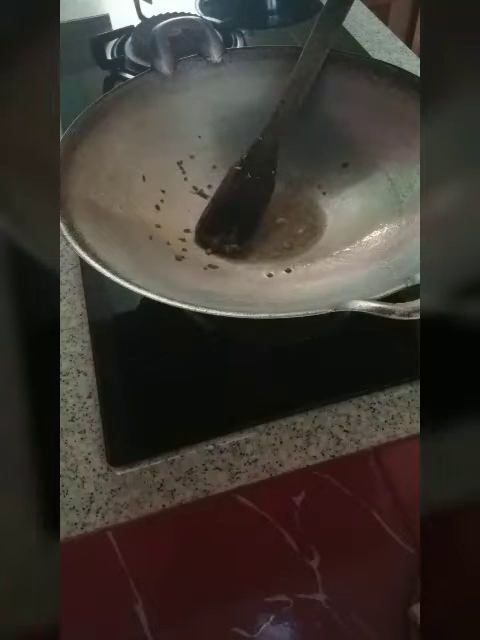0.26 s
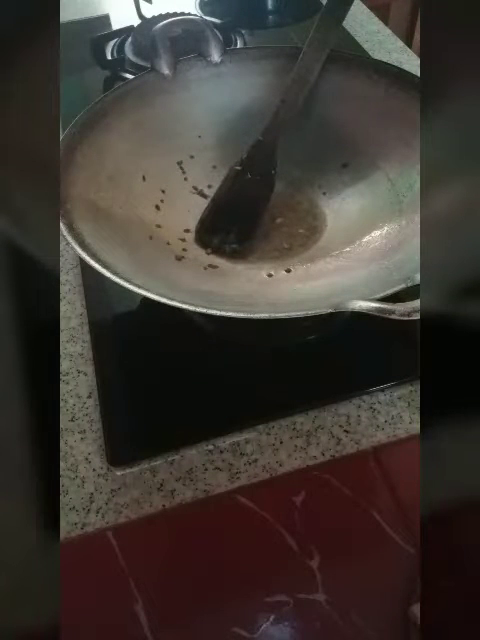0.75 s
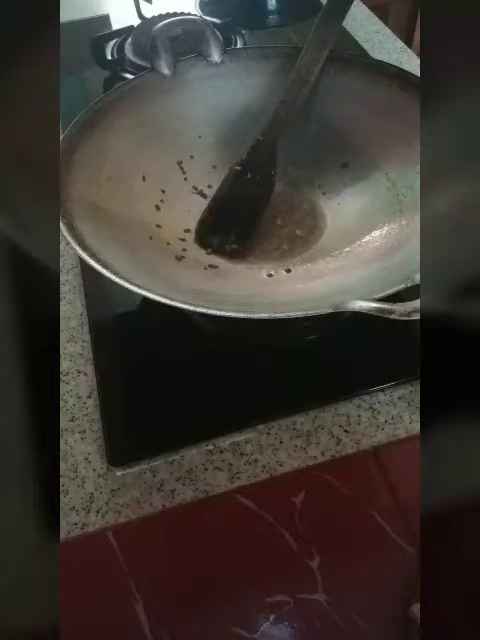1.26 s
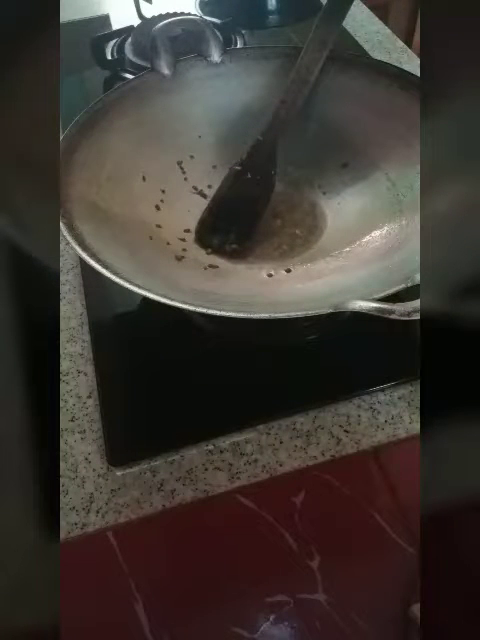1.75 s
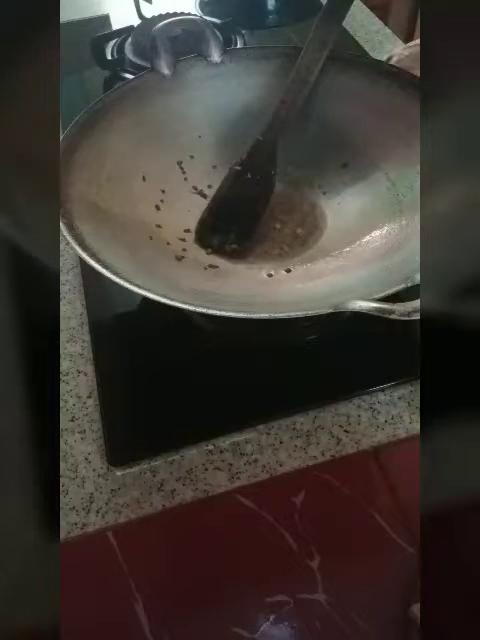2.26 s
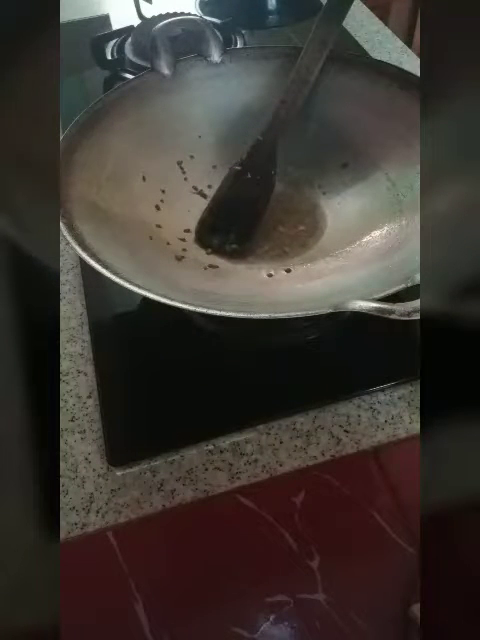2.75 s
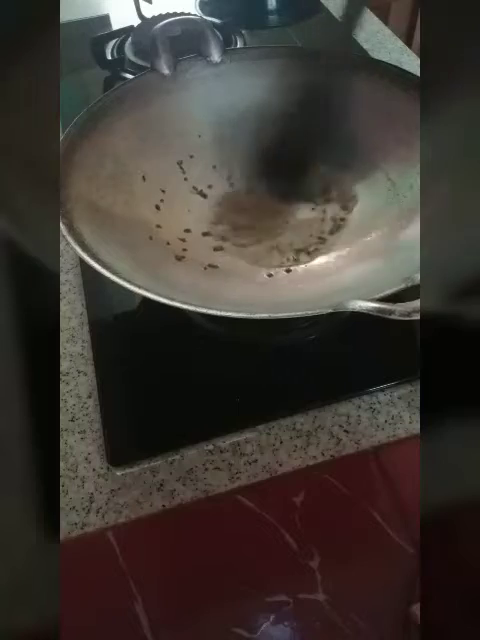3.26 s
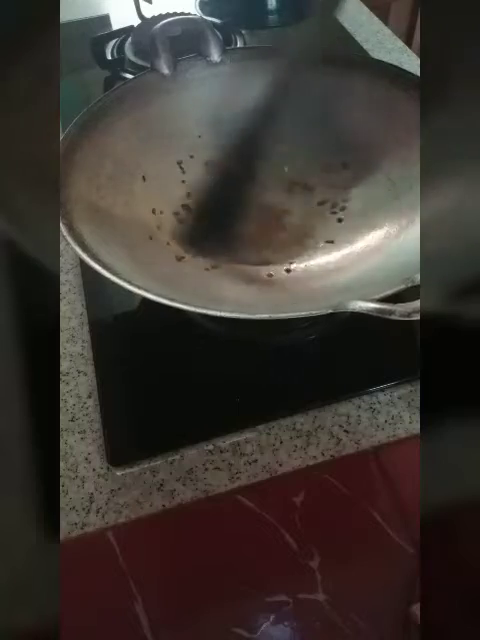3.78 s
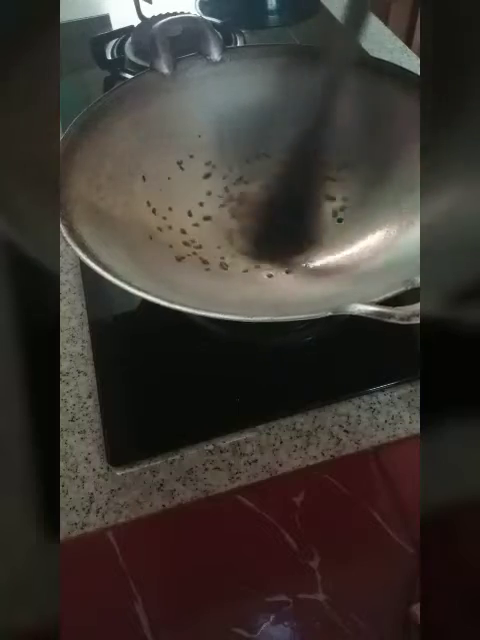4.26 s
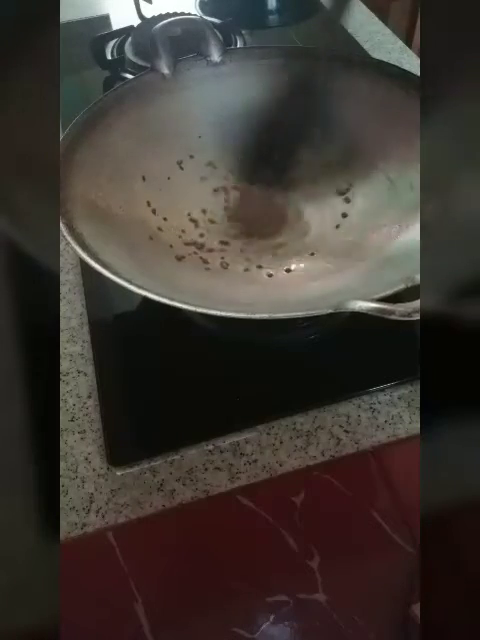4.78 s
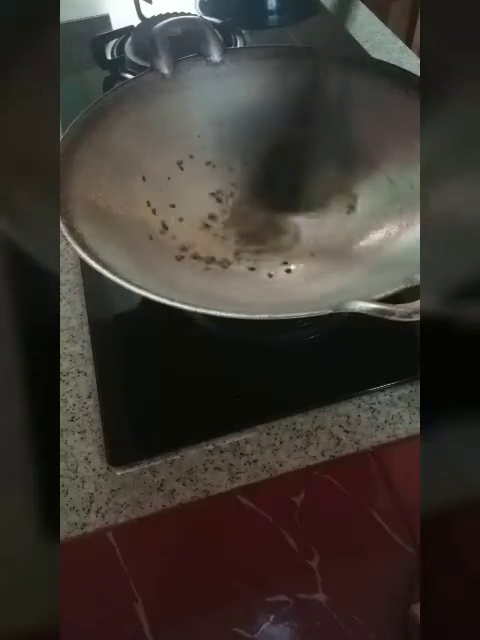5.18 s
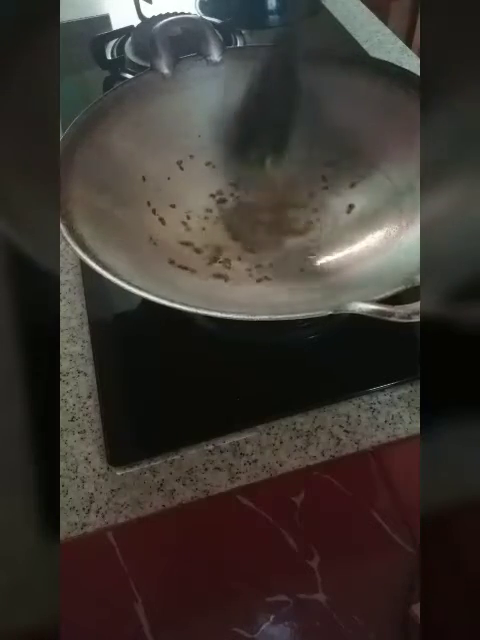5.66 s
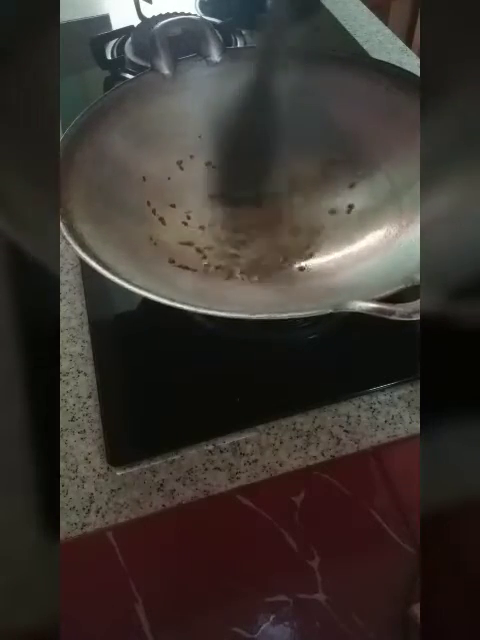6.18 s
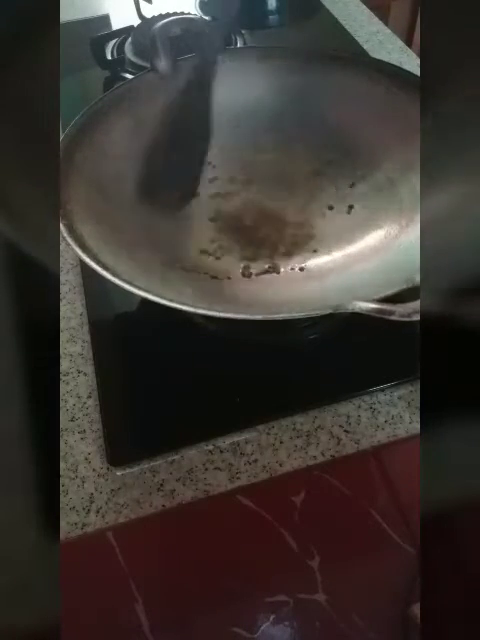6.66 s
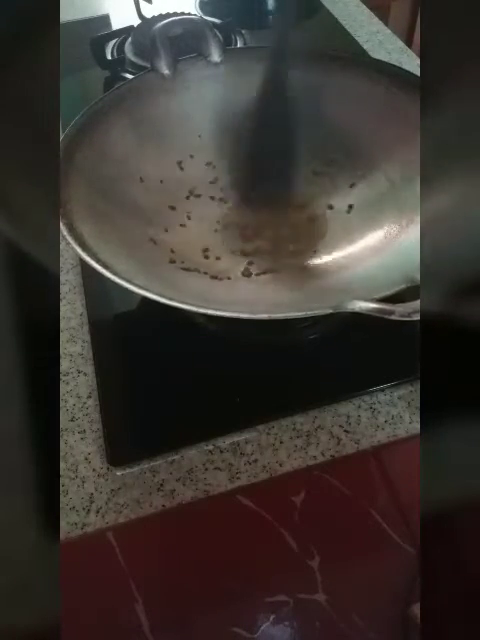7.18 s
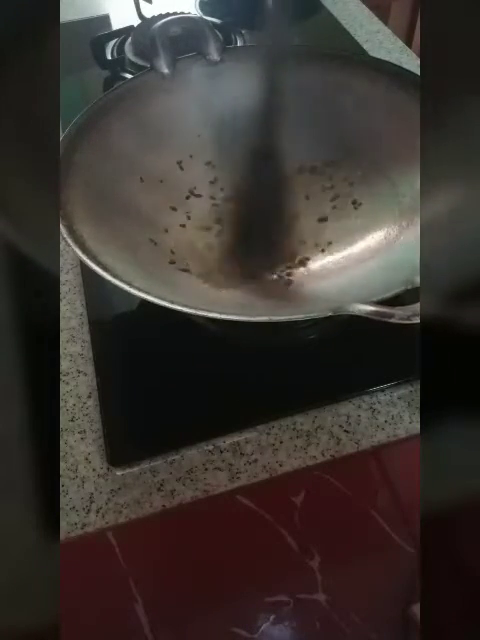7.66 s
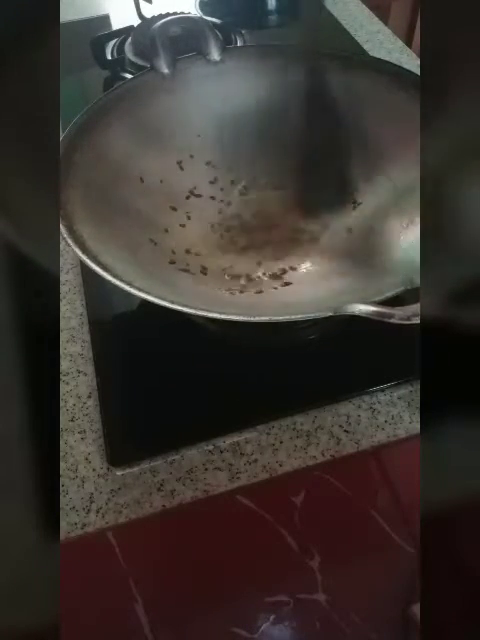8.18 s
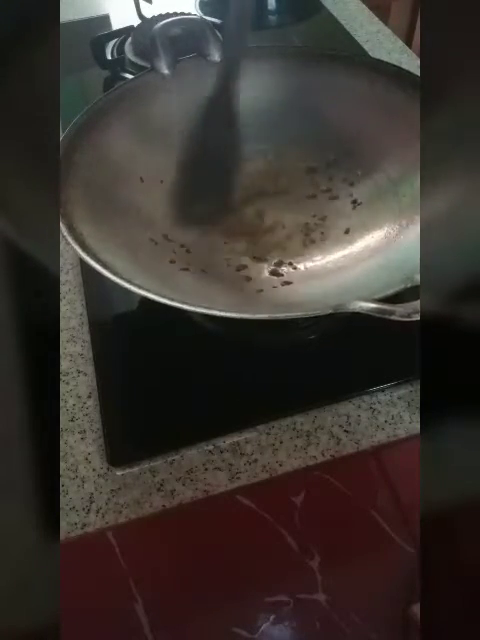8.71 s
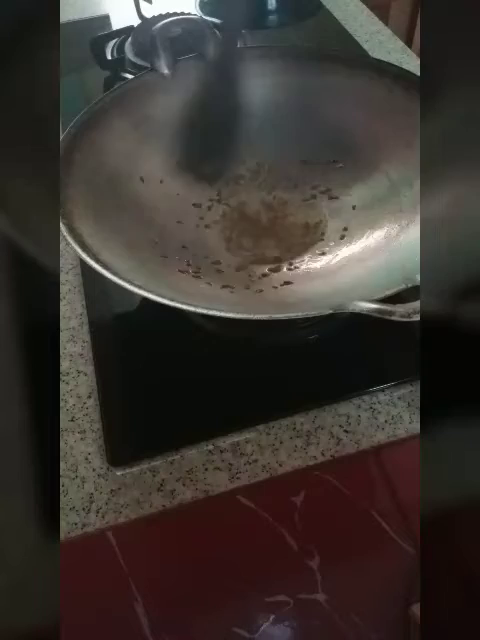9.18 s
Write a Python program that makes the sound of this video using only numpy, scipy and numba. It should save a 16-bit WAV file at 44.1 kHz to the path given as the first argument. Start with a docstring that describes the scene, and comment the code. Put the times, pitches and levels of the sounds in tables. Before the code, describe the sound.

Spices sizzle and pop sharply in hot oil in a steel wok, then a wooden spatula knocks and scrapes through the crackle.

```python
"""Whole spices fry in oil in a steel wok: steam bubbles burst as short damped tones that rise in pitch,
seeds pop and tap the steel, and oil spits in sprays of tiny cracks. A wooden spatula knocks, scrapes and rocks
the wok, which answers on its modes. Dull thuds from elsewhere in the kitchen and a soft tone come early on,
over a low murmur of fans and burner. Tiled walls add a short bright tail, heard by a phone with two unlike
microphone ports."""
import sys
import numpy as np
from scipy import signal
from scipy.fft import rfft, irfft
from scipy.io import wavfile
from numba import njit

SR = 44100
rng = np.random.default_rng(int(sys.argv[2]) if len(sys.argv) > 2 else 0)


def dump_mix(stems):
    """Bounce the given channels to the path in sys.argv[1] as a 16-bit WAV at rate SR."""
    frames = np.atleast_2d(stems).T  # one column per channel
    limited = np.clip(frames, -1, 1)  # hard clip at full scale
    pcm = np.round(limited * 32767).astype(np.int16)
    wavfile.write(sys.argv[1], SR, pcm)


N = 416302

# Seeds bursting. Each row: start in seconds, relative level in dB, pitch in Hz, ring (60 dB decay) in cycles.
SEED_POPS = [(0.030, -8.5, 3770, 7.8), (0.197, -14.5, 4000, 7.2), (0.242, -11, 4540, 1.1),
             (0.26, -15, 3530, 8.8), (0.277, -17, 3460, 14), (0.311, -15.5, 3600, 4.6),
             (0.481, -11, 4930, 4.5), (0.52, -31, 3840, 8), (0.604, -27, 3850, 10), (0.639, -22, 4300, 8.3),
             (0.691, -12.5, 3960, 4.6), (0.875, -14, 4250, 6.6), (0.94, -10, 4430, 3.3),
             (0.977, -17.5, 2420, 7.4), (1.001, -12, 3630, 13), (1.039, -15, 2890, 13),
             (1.096, -10, 3640, 4.3), (1.213, -14, 4650, 10), (1.261, -8.5, 3600, 6),
             (1.313, -21.5, 2420, 9.9), (1.393, -19, 5260, 4.7), (1.409, -13.5, 4140, 4.7),
             (1.47, -21, 4100, 11), (1.497, -17, 4440, 19), (1.524, -7.5, 2920, 11),
             (1.683, -9.5, 2600, 2.7), (1.727, -16, 5870, 6.7), (1.779, -21.5, 4700, 16),
             (1.987, -20, 3050, 14), (1.996, -21, 3250, 10), (2.043, -9, 4300, 3.8),
             (2.066, -15, 2150, 6.9), (2.07, -15, 3360, 8.2), (2.11, -20, 3930, 5.5), (2.184, -25, 3900, 8),
             (2.229, -6, 2950, 2.3), (2.301, -18, 4540, 13), (2.384, -14.5, 2300, 6.8),
             (2.439, -13, 4010, 7.3), (2.587, -18, 4800, 5), (2.64, -12.5, 5200, 4.8),
             (2.674, -17.5, 5130, 6.9), (2.734, -15.5, 5300, 6.2), (2.819, -30, 3800, 4.6),
             (2.856, -21, 3280, 4.1), (2.89, -22, 3870, 6.5), (2.904, -20, 5840, 6.9),
             (2.953, -13, 3430, 3.8), (3.02, -32, 3670, 5.7), (3.088, -38, 4000, 6.2),
             (3.105, -14, 4760, 5.9), (3.127, -19.5, 3560, 19), (3.173, -17, 3770, 4.7),
             (3.276, -9, 2860, 2.5), (3.304, -20, 3760, 19), (3.337, -18, 3200, 2.8),
             (3.387, -17, 3500, 5.4), (3.494, -19.5, 3670, 4.4), (3.528, -11.5, 3720, 3.7),
             (3.556, -16, 2500, 8), (3.625, -8.5, 2250, 3.4), (3.677, -14, 3330, 33),
             (3.742, -17, 2180, 6.4), (3.818, -15.5, 5330, 14), (3.882, -17.5, 4970, 23),
             (3.966, -24, 5360, 19), (4.021, -18, 3250, 4.3), (4.081, -22, 6900, 32),
             (4.13, -19, 3420, 3.8), (4.142, -13.5, 3200, 2.5), (4.213, -16, 4340, 4.9),
             (4.242, -17.5, 3300, 4.6), (4.293, -12.5, 4660, 11), (4.325, -17, 4100, 4.6),
             (4.415, -11, 4240, 6.2), (4.481, -18, 2720, 2.7), (4.53, -13, 5200, 5),
             (4.63, -12.5, 3140, 2.7), (4.701, -22, 2580, 3), (4.728, -31, 3700, 6),
             (4.759, -15, 3950, 5.5), (4.842, -5.5, 2230, 1.5), (4.917, -23, 2670, 40),
             (4.921, -10, 4200, 16), (4.978, -11, 4630, 8.9), (5.025, -9, 3970, 3.1),
             (5.027, -25, 2670, 53), (5.097, -23, 5550, 6.8), (5.18, -19, 2070, 4.9),
             (5.233, -3.5, 2180, 3.4), (5.262, -19, 1930, 1.7), (5.407, -19.5, 4600, 7.9),
             (5.541, -29, 3440, 4.1), (5.585, -27, 2560, 9.4), (5.642, -12.5, 3280, 33),
             (5.788, -19, 4750, 12), (5.905, -18, 2750, 3.5), (5.966, -15.5, 6040, 3.2),
             (6.07, -29, 3700, 4.4), (6.11, -22, 3800, 5.4), (6.16, -13, 3540, 2.4),
             (6.385, -31, 4300, 2.1), (6.434, -14.5, 3970, 2), (6.537, -13, 4880, 9.2),
             (6.629, -22, 2000, 3), (6.681, -27, 3480, 5.2), (6.7, -28, 3700, 2.9),
             (6.847, -17.5, 4500, 3.7), (6.897, -9.5, 4150, 1.8), (7.133, -25, 3070, 4.2),
             (7.194, -19.5, 3980, 13), (7.269, -20, 3120, 4.6), (7.496, -12, 4180, 3.3),
             (7.632, -8, 3660, 0.93), (7.941, -18.5, 2450, 5.4), (7.977, -11, 4440, 5.2),
             (8.146, -22.5, 3530, 2.7), (8.219, -14, 4500, 5.1), (8.436, -9.5, 3380, 5.1),
             (8.511, -20, 3740, 13), (8.571, -17, 2300, 2.4), (8.615, -25, 4770, 15),
             (8.687, -17.5, 3400, 3.9), (8.73, -9, 3300, 1.2), (8.764, -20, 3520, 9),
             (8.971, -19.5, 4500, 7), (9.139, -20, 3400, 3.7), (9.203, -11.5, 4800, 2.7)]
# Spatula strokes, a knock that starts a scrape and rocks the wok. Each row: start in seconds, then relative
# levels in dB of the knock, the scrape, the low boom and the singing steel.
SPATULA_STROKES = [(1.799, -52, -64, -44.5, -60), (2.256, -52, -67, -48, -72), (2.659, -64, -68, -51, -73),
                   (3.149, -53, -62, -46, -46), (3.309, -42.5, -52, -42, -61), (3.399, -59, -63, -40, -66),
                   (3.54, -36, -55, -42, -63), (3.913, -34, -40.5, -40, -53),
                   (4.143, -32.5, -43, -35.5, -49), (4.316, -31.5, -37, -34, -44.5),
                   (4.687, -35, -40, -50, -63), (4.775, -44, -42, -47, -45.5), (4.87, -32.5, -40, -46, -51),
                   (5.056, -38.5, -44, -47, -51), (5.149, -46, -44, -41, -50), (5.28, -43, -55, -58, -54),
                   (5.423, -45, -49, -44, -65), (5.555, -47, -59, -45, -53), (5.81, -57, -45, -43, -52),
                   (6.067, -41.5, -65, -55, -66), (6.392, -39, -38.5, -40, -51),
                   (6.469, -41, -59, -63, -62), (6.676, -46, -39.5, -41.5, -54),
                   (6.767, -44, -51, -54, -66), (6.874, -43, -51, -40, -50), (7.119, -50, -40, -38, -48),
                   (7.23, -39, -41, -33.5, -43), (7.38, -35.5, -55, -58, -47), (7.552, -37, -55, -38, -49),
                   (7.681, -41, -49, -48, -63), (7.948, -46, -58, -61, -69), (8.35, -38.5, -36, -35.5, -53),
                   (8.516, -33, -43, -55, -58), (8.572, -40, -42, -60, -36.5), (8.693, -41, -50, -43, -56),
                   (8.867, -38, -41, -44, -60), (8.969, -47, -56, -37.5, -69), (9.174, -37, -41, -37, -50),
                   (9.304, -53, -63, -40.5, -68), (9.415, -38, -56, -43, -55)]
# Modes of the steel wok. Each row: frequency in Hz, relative level in dB, 60 dB decay time in seconds.
WOK_MODES = [(134.24, -2.5, 0.12), (154, -9, 0.11), (282, -12, 0.078), (365, -11, 0.072),
             (438, -13.5, 0.11), (522.6, 1.5, 0.097), (660, 10.5, 0.058), (745, 0.5, 0.089),
             (817, -8, 0.078), (1035, -12, 0.14), (1194, -12.5, 0.12), (1270, -15, 0.1), (1374, -22, 0.21),
             (1551, -15, 0.049), (1868, -21, 0.31), (2290, -16, 0.085), (2630, -16.5, 0.14)]
TRAVEL_S = 0.0015  # from the oil to the phone


def undb(db):
    """Amplitude ratio of a level in dB."""
    return 10 ** (np.asarray(db) / 20)


def rms(x):
    """Root mean square, the effective amplitude."""
    return np.sqrt(np.mean(x ** 2))


def curves(table):
    """Columns of a table, interpolated linearly over the times in its first column."""
    s, *columns = np.transpose(table)
    return [np.interp(np.arange(N) / SR, s, c) for c in columns]


def band(x, lo_hz, hi_hz):
    """Band-pass filter with maximally flat response."""
    return signal.sosfilt(signal.butter(2, [lo_hz, hi_hz], "bandpass", fs=SR, output="sos"), x)


def noise(lo_hz, hi_hz):
    """Band-limited Gaussian noise of unit effective amplitude."""
    x = band(rng.standard_normal(N), lo_hz, hi_hz)
    return x / rms(x)


@njit
def rings(n, at, hz, t60, size, glide):
    """Damped oscillators that swell over about a cycle; the pitch climbs by glide times itself over the ring."""
    out = np.zeros(n)
    for k in range(len(at)):
        start, span = int(at[k] * SR), int(t60[k] * SR) + 1
        state = size[k] + 0j
        step = np.exp(2j * np.pi * hz[k] / SR - np.log(1000) / span)  # turns and decays by 60 dB over span
        bend = np.exp(2j * np.pi * hz[k] / SR * glide / span)
        rest, swell = 1., np.exp(-hz[k] / SR)
        for i in range(start, min(n, start + span)):
            out[i] += state.imag * (1 - rest)
            state, step, rest = state * step, step * bend, rest * swell
    return out


def ports(x):
    """Cavity resonance colours each port: a minimum-phase filter, from the folded cepstrum of its log gain."""
    # Each row: frequency in Hz, left gain in dB, right gain in dB.
    # The left cavity peaks low and cancels where the right one peaks.
    port_gains = [(90, -7, -8), (487, -4, -7), (946, -2.5, -10.5), (1660, 8.5, -3), (2090, 19.5, 7.5),
                  (2894, 19, 3), (3643, 30, 10.5), (4190, 24, 9.5), (5000, 16.5, 10.5), (7020, 0.5, 8),
                  (7620, -5, 11), (8580, -2.5, 23), (9900, -17.5, 16.5), (10770, 8, 13.5), (12100, 5, 12.5),
                  (14920, -3, 7), (16000, -39, -27)]
    hz, *db = np.transpose(port_gains)
    log_hz = np.log(np.maximum(np.fft.rfftfreq(2048, 1 / SR), 1))
    gain = undb([np.interp(log_hz, np.log(hz), d) for d in db])
    cepstrum = irfft(np.log(gain))
    cepstrum[:, 1:1024] *= 2  # folding makes the response causal
    cepstrum[:, 1025:] = 0
    response = irfft(np.exp(rfft(cepstrum)))[:, :1024]
    return signal.fftconvolve(x * np.ones((2, 1)), response, axes=1)[:, :N]


def room(x):
    """Reverberation: a straight path plus exponentially dying echoes, other for each port, lumpy at first."""
    t60_s, middle_t60_s, treble_t60_s = 0.27, 0.11, 0.32  # the middle band dies soonest
    direct_db = (-16.5, -1.06)  # left, right, against the tail: the left port faces away
    t = np.arange(SR // 3) / SR
    steps = np.repeat(rng.standard_normal((2, len(t) // 50)), 50, axis=1)
    lumps = undb(3.5 * np.exp(-t / 0.03) * steps)
    onset = np.clip(t / 0.00028, 0, 1) ** 2 * (1 + 0.23 * np.exp(-t / 0.017))
    echoes = rng.standard_normal((2, len(t))) * lumps * onset
    high = signal.sosfilt(signal.butter(2, 6500, "highpass", fs=SR, output="sos"), echoes)
    middle = band(echoes, 940, 2790)
    tail = (echoes - high - middle) * undb(-60 * t / t60_s)
    tail += high * undb(-60 * t / treble_t60_s)
    tail += middle * undb(-60 * t / middle_t60_s)
    tail /= np.sqrt(np.sum(tail ** 2, axis=1, keepdims=True))
    tail[:, 0] = undb(direct_db)
    return signal.fftconvolve(x * np.ones((2, 1)), tail, axes=1)[:, :N]


def hum():
    """Murmur of fans and burner: spectrally shaped noise that wavers, mostly coherent between the ports."""
    # Each row: frequency in Hz, relative spectral level in dB.
    murmur_spectrum = [(15, -61), (25, -2), (43, -6), (86, -8), (129, 3.5), (204, -7), (235, -1.5),
                       (266, -10), (559, -14.5), (1060, -26.5), (1700, -26), (2210, -36), (3740, -120)]
    hz, db = np.transpose(murmur_spectrum)
    log_hz = np.log(np.fft.rfftfreq(N, 1 / SR) + 1)
    gain = undb(np.interp(log_hz, np.log(hz), db, right=-120))
    mid, side = irfft(rfft(rng.standard_normal((2, N))) * gain, N)
    both_ports = mid + 0.55 * side * np.array([[1], [-1]])
    return both_ports / rms(mid) * undb(-49.5 + 2.6 * noise(0.38, 9.5))


def hoot():
    """A faint pure tone under a Gaussian envelope, so it swells and fades."""
    peak_s, hz, half_s, relative_db = 0.075, 405, 0.045, -43
    t = np.arange(N) / SR
    return undb(relative_db) * np.exp(-((t - peak_s) / half_s) ** 2) * np.sin(2 * np.pi * hz * t)


def blows(events, modes, crack_db, crack_s, top_hz, split_hz, spread_db):
    """Modal excitation: each blow weights the modes anew, as beating close pairs, over a burst of contact noise."""
    s, db = np.transpose(events)[:2]
    hz, mode_db, t60 = (np.tile(c, len(s)) for c in np.transpose(modes))
    weight = rng.standard_normal((len(s), len(modes))).ravel()
    size = undb(np.repeat(db, len(modes)) + mode_db + spread_db * weight)
    size = size * (-1.) ** np.arange(len(hz))  # neighbouring modes start in opposite sense
    split = split_hz * (0.5 + rng.random(len(hz)))
    at = np.tile(np.repeat(s, len(modes)), 2)
    ring = rings(N, at, np.r_[hz, hz + split], np.r_[t60, 0.7 * t60], np.r_[size, -0.6 * size], 0.0)
    hits = np.zeros(N)
    hits[(s * SR).astype(int)] = undb(db + crack_db)
    fade = signal.lfilter([1], [1, -undb(-60 / (crack_s * SR))], hits)  # falls 60 dB in crack_s
    return ring + fade * noise(170, top_hz)


def thuds():
    """Far blows: a long soft contact low-passes the force on low modes, and a dull diffuse wash follows."""
    # Each row: start in seconds, relative level in dB.
    thud_times = [(.379, -14.5), (0.761, -33)]
    # Each row: frequency in Hz, relative level in dB, 60 dB decay time in seconds.
    thud_modes = [(118.7, -7.5, 0.93), (146, -4, 0.87), (188, 1.5, 0.63), (234, -16, 0.93),
                  (301, -11, 0.59), (393, -14, 1), (511, -10, 1), (543, -11, 1), (615, -24, 0.46),
                  (692, -11, 0.93), (929, -11, 0.3), (1217, -5, 0.25), (1420, -13, 0.34)]
    push = np.hanning(int(SR / 1100))
    blow = blows(thud_times, thud_modes, crack_db=-3.0, crack_s=0.52, top_hz=1810, split_hz=7.2, spread_db=0.5)
    blow = signal.fftconvolve(blow, push / push.sum())[:N]
    s, db = np.transpose(thud_times)
    t = np.arange(N) / SR - s[:, None]

    def wash(rise_s, t60_s):
        """Linear rise and exponential decay after each blow."""
        return np.sum(np.clip(t / rise_s, 0, 1) * undb(db[:, None] - 60 * np.abs(t) / t60_s), axis=0)

    slow = wash(0.0092, 1.15) * (undb(-12) * noise(113, 185) + undb(-14) * noise(160, 790))
    quick = wash(0.0085, 0.36) * undb(-15) * noise(450, 2850)
    return blow + slow + quick


def knocks():
    """Impact on a plate: wood is a soft striker, so only the lower wok modes and dull contact noise are heard."""
    struck = blows(SPATULA_STROKES, WOK_MODES, crack_db=5.5, crack_s=0.071, top_hz=905,
                   split_hz=30.0, spread_db=4.0)
    return band(struck, 80, 1060)


def strokes(steady_db, peak_db, rise_s, fall_s):
    """Energy summation: each stroke lifts the gain of a steady layer by a pulse that rises and decays."""
    t = np.maximum(np.arange(N) / SR - np.transpose(SPATULA_STROKES)[0][:, None], 0)
    shape = (1 - np.exp(-t / rise_s)) * np.exp(-t / fall_s)
    lift = undb(peak_db)[:, None] * shape / shape.max()
    return np.sqrt(undb(steady_db) ** 2 + np.sum(lift ** 2, axis=0))


def stirring():
    """Friction drives resonance: rocking booms on the lowest mode, a grainy rub makes the upper modes sing."""
    # Steady rocking and rubbing under the strokes. Each row: time in seconds, then relative levels in dB
    # of the low boom, the scrape and the singing steel.
    steady_rub = [(0.9, -69, -94, -64), (2.95, -54, -57.5, -61.5), (3.05, -48.5, -51, -50.5),
                  (3.51, -44.5, -52, -56.5), (3.93, -47.5, -50, -53), (4.3, -46, -44.5, -51.5),
                  (5.01, -44, -51.5, -50), (5.89, -52.5, -61, -58.5), (6.5, -53.5, -60, -54.5),
                  (7.2, -45, -50.5, -52), (8.04, -47.5, -50.5, -56.5), (8.63, -46, -53, -54.5),
                  (8.93, -51, -53, -58.5), (9.44, -39, -39, -55.5)]
    boom_db, scrape_db, sing_db = curves(steady_rub)
    stroke_scrape_db, stroke_boom_db, stroke_sing_db = np.transpose(SPATULA_STROKES)[2:]
    rocking = strokes(boom_db, stroke_boom_db, rise_s=0.016, fall_s=0.055)
    dragging = strokes(scrape_db, stroke_scrape_db, rise_s=0.009, fall_s=0.064)
    singing = strokes(sing_db, stroke_sing_db, rise_s=0.009, fall_s=0.059)
    boom_hz = WOK_MODES[0][0] + 8.4 * noise(1.7, 12.3)
    boom = np.sin(2 * np.pi * np.cumsum(boom_hz) / SR) + 0.52 * noise(66, 196)
    boom = boom * undb(1.8 * noise(0.47, 10.6))
    grain = undb(2.7 * noise(10.0, 113))
    rub = band(noise(385, 775), 214, 870) * grain
    sing = np.zeros(N)
    for hz, db, t60 in WOK_MODES:
        if hz > 750:
            # each upper mode comes and goes as the blade moves over the bowl
            sing += noise(hz - 2.5 / t60, hz + 2.5 / t60) * undb(db + 3.0 * noise(1.2, 5))
    upper_rub = 0.61 * noise(770, 1710) * grain
    scrape = rub / rms(rub) * dragging + (sing / rms(sing) + upper_rub) * singing
    return boom / rms(boom) * rocking, scrape


def pings():
    """Selective resonance: each bursting seed taps the steel, which rings most in upper modes near its pitch."""
    s, db, hz = np.transpose(SEED_POPS)[:3, :, None]
    mode_hz, mode_db, t60 = np.transpose([m for m in WOK_MODES if m[0] > 1500])
    octaves_off = np.abs(np.log2(hz / mode_hz))
    weight_db = 3.74 * rng.standard_normal((len(s), len(t60)))
    size = undb(db - 19 + mode_db - 4.35 * octaves_off + weight_db)
    at, ring_hz, ring_s = (v.ravel() for v in np.broadcast_arrays(s + TRAVEL_S, mode_hz, 0.47 * t60))
    return rings(N, at, ring_hz, ring_s, size.ravel(), 0.0)


def snaps():
    """Impulse cascade: a spit of oil is a crack and a spray of weaker, mostly brighter cracks that thins out."""
    # Sharp spits of oil. Each row: start in seconds, relative level in dB, centre frequency in Hz.
    oil_spits = [(0.153, -29, 9150), (0.559, -36, 8500), (0.858, -29, 8700), (0.968, -32, 8900),
                 (1.214, -27, 8640), (1.445, -28.5, 8600), (1.7968, -34, 7860), (1.6096, -29.5, 8610),
                 (1.9793, -25, 8100), (2.3992, -25, 8560), (2.438, -28, 8400), (2.4695, -25.5, 8500),
                 (2.615, -26, 8500), (3.0048, -30.5, 8500), (3.179, -27, 8640), (3.27, -26, 8800),
                 (3.3835, -25, 8940), (3.6655, -27, 9430), (3.87, -28, 8720), (3.7958, -26, 8900),
                 (4.027, -29, 8700), (4.077, -28, 8910), (4.144, -25.5, 8390), (4.1892, -28, 8900),
                 (4.26, -27, 8820), (4.412, -30, 8500), (4.521, -24, 8450), (4.663, -26, 8570),
                 (4.843, -28, 8680), (4.8604, -37, 8700), (4.919, -27, 8800), (4.8738, -24, 8400),
                 (5.095, -19.5, 11300), (5.296, -28, 8790), (5.411, -29, 9400), (5.48, -32, 8720),
                 (5.5907, -28, 8650), (5.628, -31, 8830), (5.9844, -37, 8450), (5.887, -31, 8480),
                 (5.926, -30, 8250), (6.092, -28, 8560), (6.208, -29, 8300), (6.238, -29, 9100),
                 (6.5338, -25, 8590), (6.7054, -28, 8700), (6.9165, -19.5, 8640), (7.014, -27, 10500),
                 (7.0384, -34, 9500), (7.086, -25.5, 10500), (7.136, -26, 10500), (7.162, -20.5, 11300),
                 (7.294, -22, 8500), (7.345, -45, 8800), (7.375, -31, 8900), (7.406, -24, 11500),
                 (7.4609, -35, 12100), (7.501, -14.5, 10300), (7.631, -24.5, 8600), (7.6742, -28.5, 8530),
                 (7.843, -38, 9500), (7.874, -35, 12500), (7.892, -32, 7950), (7.932, -29, 9200),
                 (8.023, -36, 10800), (8.0667, -28.5, 9700), (8.141, -29, 10200), (8.18, -27, 9300),
                 (8.596, -32, 8570), (8.6724, -31.5, 8890), (8.713, -26, 8640), (8.757, -29, 9240),
                 (8.819, -33, 8590), (9.0329, -38, 10900), (9.121, -26, 9600), (9.2575, -31, 8330),
                 (9.3356, -32, 9700)]
    s, db, hz = np.transpose(oil_spits)[:, :, None]
    lag, pitch = rng.random((len(s), 12, 2)).transpose(2, 0, 1)
    lag = 0.012 * lag ** 2 * (np.arange(lag.shape[1]) > 0)  # seconds; the first crack comes at once
    hz = np.minimum(hz * (0.75 + 0.7 * pitch), 15500)
    size = undb(db + 20.0 - 20 * np.sqrt(lag / 0.096))
    return rings(N, (s + lag).ravel(), hz.ravel(), (4 / hz).ravel(), size.ravel(), 0.0)


def bubbles(heard_db, count, lo_hz, hi_hz, cycles, spread_db, most_db):
    """Bubble resonance: sizes spread evenly in log pitch burst at random, some louder, up to a limit."""
    when, pitch, size = rng.random((count, 3)).T
    hz = lo_hz * (hi_hz / lo_hz) ** pitch
    size_db = np.minimum(-spread_db * np.log(1 - size), most_db)
    x = rings(N, when * N / SR, hz, cycles / hz, undb(size_db) * np.sqrt(hz), 0.2)
    return x / rms(ports(x).mean(axis=0)) * undb(heard_db)  # level set as the ports colour it


def pops(table):
    """Impulsive release: a seed gives a rising tone, harder at its start the briefer it rings, and a husk crack."""
    s, db, hz, cycles = np.transpose(table)
    s, ring_s = s + TRAVEL_S, cycles / hz
    tone = rings(N, s, hz, ring_s, undb(db) * np.sqrt(0.0075 / ring_s), 0.15)
    crack = rings(N, s, np.full_like(s, 3400), np.full_like(s, 0.0012), undb(db - 6.5), 0.0)
    return tone + crack


def frying():
    """Superposed independent sources: bubbles, spitting and pops at spots of the wok, each with its own echoes."""
    # Each row: time in seconds, bubbling level in dB, fine spitting level in dB, for all spots before the room.
    fry_levels = [(0.0, -24, -36.5), (0.21, -28.5, -38), (0.76, -31.5, -39.5), (1.18, -29.5, -43),
                  (1.57, -28, -43), (1.84, -38, -40.5), (2.02, -35.5, -39), (2.18, -31.5, -44),
                  (2.68, -39.5, -45), (2.92, -35, -42.5), (3.29, -27, -39.5), (4.13, -34.5, -39),
                  (4.34, -28.5, -42.5), (4.6, -35, -41.5), (4.89, -28, -38.5), (6.23, -39, -44.5),
                  (6.65, -36.5, -46), (7.15, -39.5, -47), (7.39, -30.5, -46.5), (7.57, -33, -43),
                  (8.47, -35.5, -48.5), (8.62, -28, -43.5), (8.75, -38, -47), (9.44, -40, -44)]
    # Finest, highest spitting. Each row: time in seconds, level in dB against the fine spitting.
    spray_levels = [(0, -20), (2.9, -29), (3.3, -4), (5.8, -8.5), (7.0, -5), (8.0, -6), (9.44, -5)]
    spots = 4
    bubbling_db, spitting_db = np.array(curves(fry_levels)) - 10 * np.log10(spots)
    spitting_db = spitting_db + 2.7 * noise(4.6, 30.)  # comes in flurries
    spray_db = spitting_db + curves(spray_levels)[0]
    out = 0
    for spot in range(spots):
        oil = bubbles(bubbling_db, count=700, lo_hz=2588, hi_hz=6590, cycles=19.0, spread_db=5.5, most_db=10.5)
        oil += bubbles(spitting_db, count=1400, lo_hz=5530, hi_hz=15500, cycles=3.8, spread_db=4.0, most_db=15.0)
        oil += bubbles(spray_db, count=500, lo_hz=10700, hi_hz=16000, cycles=8.6, spread_db=6.5, most_db=22.0)
        source = oil + pops(SEED_POPS[spot::spots])
        out = out + room(band(band(source, 1300, 22000), 1300, 22000))
    return out


def scene():
    """Linear superposition of all sources, part through the room and part straight to the ports."""
    knock = knocks()
    boom, scrape = stirring()
    low = knock + scrape + hoot()
    thud, spits = thuds(), snaps()
    echoed = room(0.3 * spits + pings() + 0.57 * low + 0.36 * thud + 0.38 * boom)
    # long waves reach both ports nearly alike, so much of the low sound skips the tail
    straight = 0.3 * low + 0.45 * thud + 1.57 * boom
    # the spits fly close by the right port
    near = spits * np.array([[0.05], [0.22]])
    return frying() + echoed + straight + hum() + near


def record(dry):
    """Transducer chain: arrival lag, port colour, bass cut, clipping near full scale and a steep top cut."""
    left_lag = 2  # samples by which the left port hears later
    late = np.array([np.r_[np.zeros(left_lag), dry[0, :-left_lag]], dry[1]])
    x = signal.sosfilt(signal.butter(2, 55, "highpass", fs=SR, output="sos"), ports(late))
    top_cut = signal.ellip(10, 0.2, 90, 16300, fs=SR, output="sos")
    return signal.sosfilt(top_cut, np.clip(x, -0.93, 0.93))


dry = scene()
out = record(dry)
dump_mix(out)
```